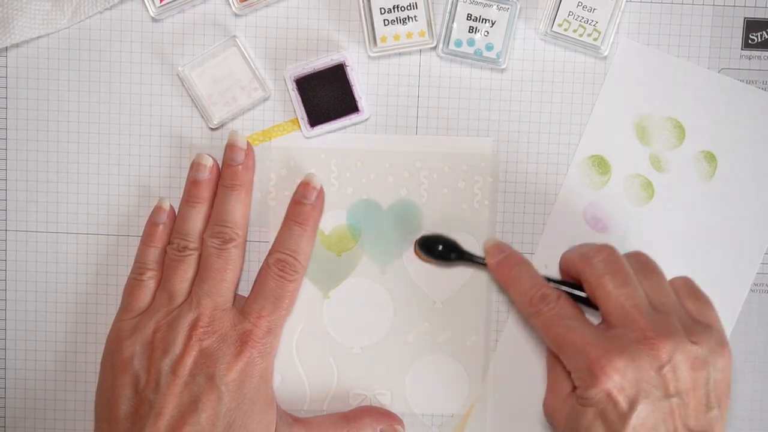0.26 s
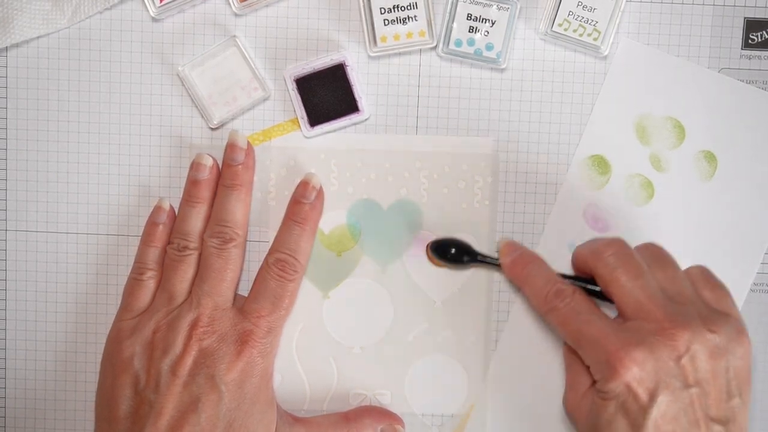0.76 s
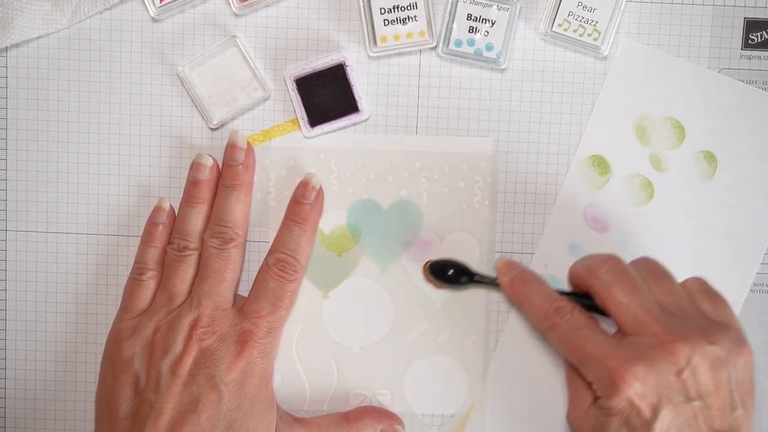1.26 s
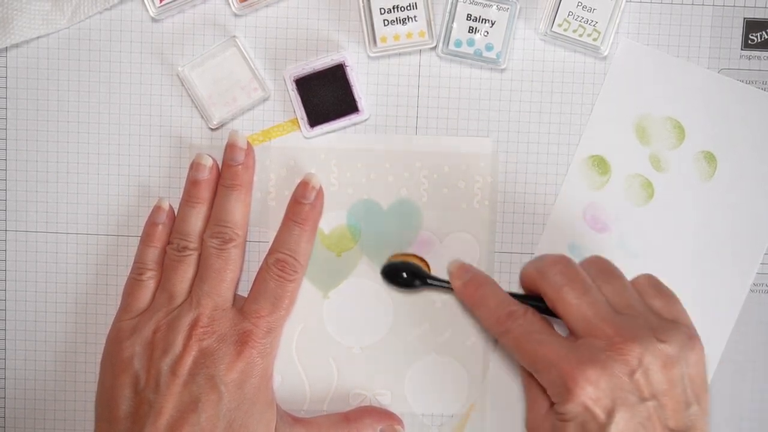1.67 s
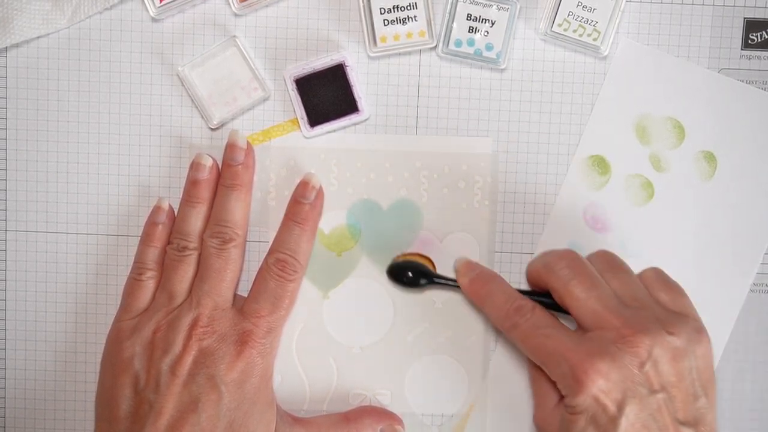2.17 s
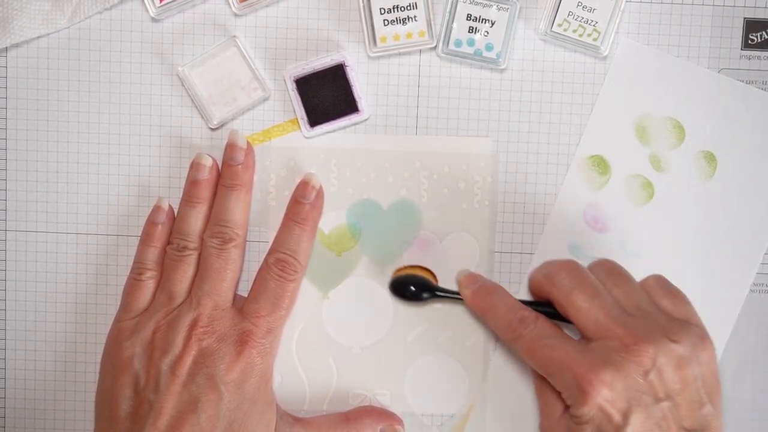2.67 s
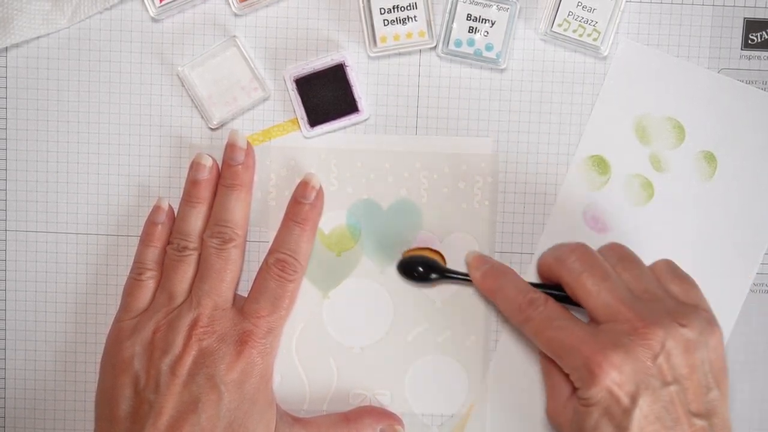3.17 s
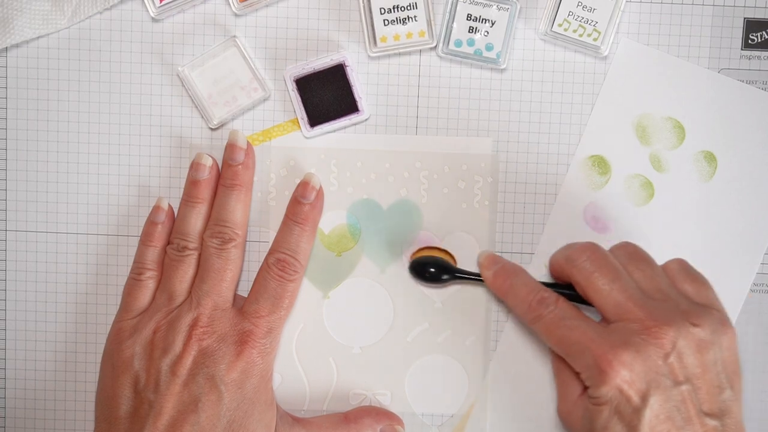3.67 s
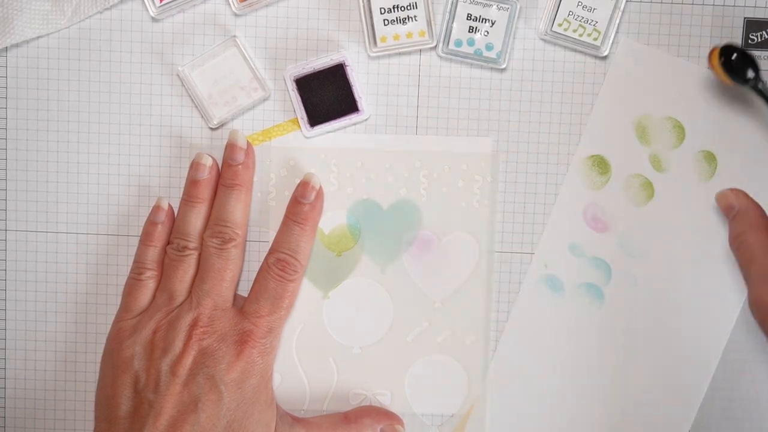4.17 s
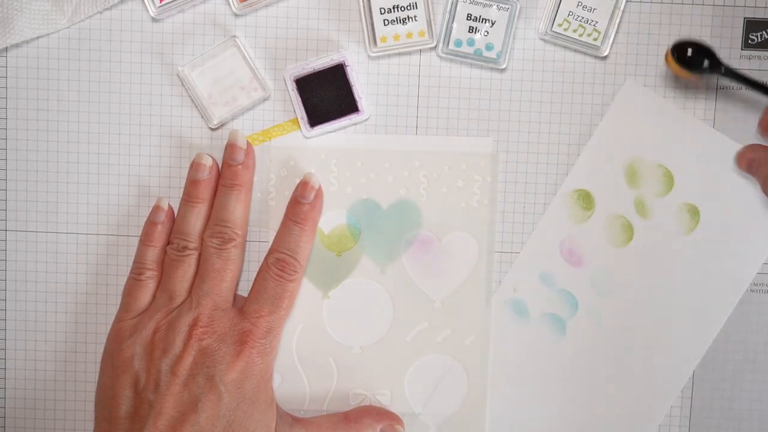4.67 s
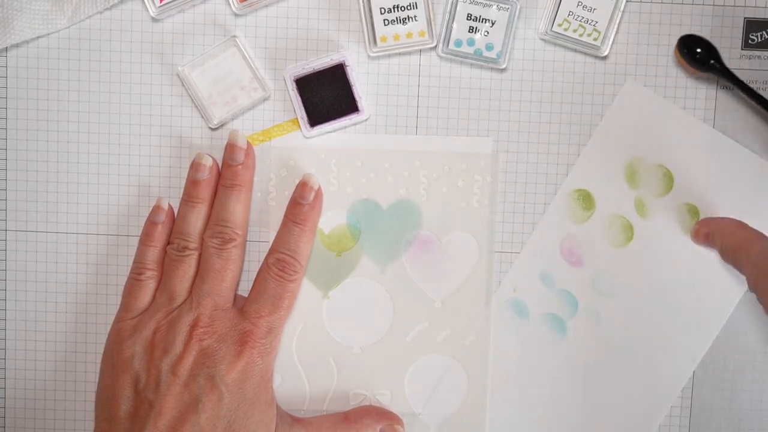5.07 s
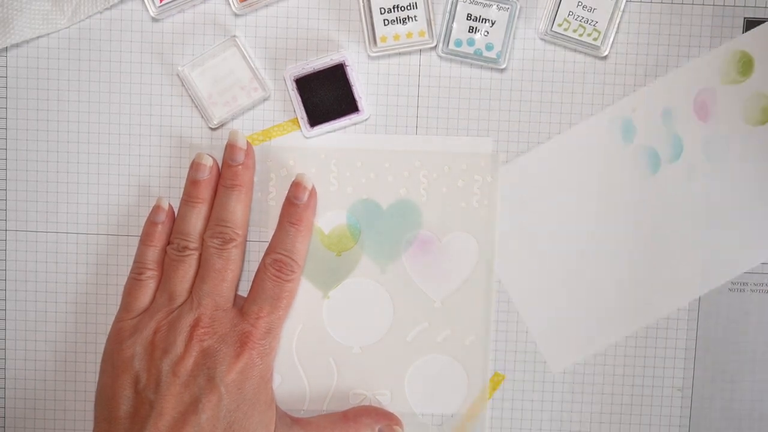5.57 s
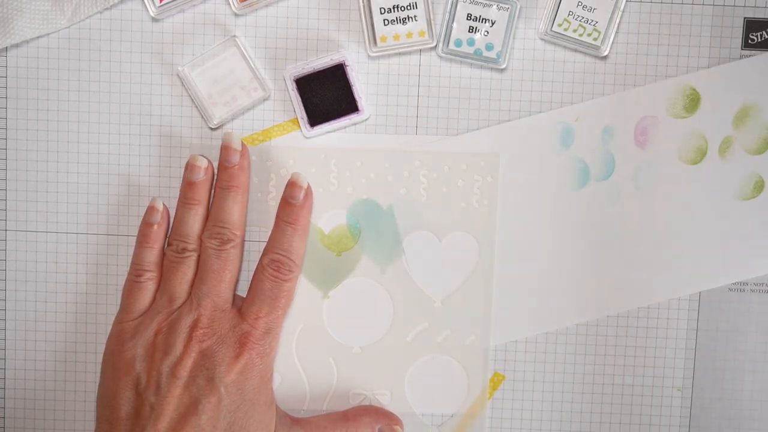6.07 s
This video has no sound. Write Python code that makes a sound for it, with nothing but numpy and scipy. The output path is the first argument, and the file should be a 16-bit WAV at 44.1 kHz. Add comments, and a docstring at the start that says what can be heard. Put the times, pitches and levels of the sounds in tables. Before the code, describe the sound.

A soft brush swishes in quick, growing circles over a plastic stencil, then paper snaps, scrapes and rustles as it is turned.

```python
"""Small room, craft table: a soft brush circles over a plastic stencil; fingers drag, snap and turn paper.
Bristles, sheet and skin are noise with spectral peaks; snaps and ticks are short bursts of crackle.
A motor hums under a faint hiss and a low rumble; the walls answer briefly."""
import sys
import numpy as np
from scipy import signal
from scipy.fft import rfft, irfft, next_fast_len
from scipy.io import wavfile
from scipy.ndimage import uniform_filter1d, map_coordinates

SR = 44100
rng = np.random.default_rng(int(sys.argv[2]) if len(sys.argv) > 2 else 0)


def materialize(psi):
    """Save the field psi as 16-bit PCM at rate SR to the path in sys.argv[1].

    A 1-D psi becomes a single channel; in a 2-D psi each row is a channel.
    """
    bounded = np.clip(np.atleast_2d(psi).T, -1, 1)
    quanta = np.round(bounded * 32767).astype(np.int16)
    wavfile.write(sys.argv[1], SR, quanta)


def gain_from_decibels(decibels):
    """Convert decibel values to linear amplitude factors."""
    exponent = np.asarray(decibels, float) / 20
    return 10 ** exponent


N = 278271  # samples

# motor lines: [f/Hz, mean level/dB]
MOTOR_LINES = [(59.5, -101), (120, -103), (240, -99.5), (360.3, -70.5), (480.4, -77.5)]
# spectra of low rumble and room hiss: [f/Hz, relative density/dB]
RUMBLE_SPECTRUM = [(150, -38), (300, -4), (420, 1.5), (530, -5.5), (800, -38.5)]
ROOM_SPECTRUM = [(25, -39), (45, -35), (60, -26), (90, -31.5), (190, -16), (280, -13.5), (380, -3.5),
                 (480, -11), (700, -16), (1900, -15), (3500, -17.5), (8000, -21), (16000, -26)]
# left-right likeness of room, brush, hands and paper: [f/Hz, correlation/1]
ROOM_LIKENESS = [(60, 0.69), (240, 1), (950, 0.62), (3770, 0.13), (15000, 0.15)]
BRUSH_LIKENESS = [(60, 0.65), (240, 0.6), (950, 1), (3770, 0.92), (15000, 0.55)]
NEAR_LIKENESS = [(60, 1.0), (240, 1), (950, 0.85), (3770, 0.94), (15000, 0.58)]
# brush circles, sweep and return:
# [start t/s, sweep share/1, sweep level/dB, return level/dB, treble over hiss/dB, easing at start/dB]
BRUSH_CIRCLES = [(0.0, 0.56, -72, -71.5, 5.5, 13), (0.23, 0.96, -67.5, -69, 1.5, 7.5),
                 (0.5, 0.43, -68.5, -68, -1, 6), (0.725, 0.44, -66, -63, 0.5, 4.5),
                 (1.03, 0.94, -62.5, -60.5, 2, 5.5), (1.295, 0.86, -61.5, -59, 1.5, 3),
                 (1.55, 0.68, -58, -59.5, 1.5, 7), (1.82, 0.85, -60, -63.5, 0.5, 6),
                 (2.045, 0.78, -59.5, -60, 2, 7.5), (2.3, 0.77, -62.5, -61.5, 1, 3.5),
                 (2.55, .72, -58.5, -60, 1, 9.5), (2.8, .7, -59, -61, 2, 8),
                 (3.05, 0.53, -56, -55.5, 1.5, 11), (3.345, 0.32, -58, -58, 1.5, 2),
                 (3.595, 0.53, -61.5, -58, 2, 7.5), (3.815, 0.35, -58.5, -55, 1.5, 1.5)]
# spectra of brush body and bristle tips: [f/Hz, relative density/dB]
BRISTLE_SPECTRUM = [(410, -62), (700, -17.5), (1860, -9), (2060, -7), (3840, -9.5), (8000, -7),
                    (10400, -13), (17600, -120)]
TIP_SPECTRUM = [(5000, -35), (7500, -9), (10000, -9.5), (13000, -8), (16000, -14)]
# peaks in the brush's colour, perhaps from close echoes: [f/Hz, width/Hz, level before common lift/dB]
BRUSH_PEAKS = [(1836, 15.7, 7), (2785, 48, -3), (3860, 98, 7), (4405, 56, 5), (4840, 45, 1),
               (5780, 193, 6.5), (6610, 165, 4.5), (7330, 56, -20), (8250, 91, -28), (8810, 116, 0.5),
               (9410, 140, 2.5), (10050, 260, -4.5), (11200, 370, -25), (11840, 110, 1.5), (12600, 160, -2),
               (15160, 240, -2)]
# decay of the room's answer: [f/Hz, t60/s]
WALL_DECAY = [(500, 1), (3000, 0.33), (8000, 0.16), (15000, 0.12)]
# ticks of stencil edge, paper fold or table: [t/s, level before envelope/dB, centre f/Hz, width/octaves]
EDGE_TICKS = [(1.567, -44.5, 3500, 2.1), (1.786, -46, 3000, 2.6), (1.83, -50.5, 3000, 2.4),
              (2.518, -53.5, 2000, 1.1), (2.807, -44.5, 2500, 1.7), (2.809, -53.5, 700, 1.06),
              (3.06, -51.5, 1500, 0.61), (3.061, -55, 604, 0.83), (3.357, -38.5, 5000, 1.3),
              (4.319, -49.5, 10020, 0.42), (4.456, -57, 9040, 0.54), (4.671, -26.5, 4520, .73),
              (4.969, -53.5, 9100, 0.7), (5.068, -41, 6800, 0.44), (5.11, -39.5, 8000, .36),
              (5.243, -23, 3500, 0.32), (5.481, -22, 6000, .41), (5.503, -29, 4000, 0.39),
              (5.515, -40, 4000, 0.38), (5.733, -20, 6000, 0.78)]
# double snaps of brush on stencil (first row) and of paper:
# [t/s, level before envelope/dB, centre f/Hz, width/octaves, rebound re crack/dB]
DOUBLE_SNAPS = [(3.841, -36, 8200, 0.22, -8.5), (4.468, -23, 7200, .49, -2), (4.689, -5, 4900, .67, -14),
                (5.162, -9.5, 4430, 1.17, -11.5), (5.251, -2, 4630, 1.05, -16)]
# short dull rubs, perhaps the heel of the hand shifting: [start t/s, level/dB]
HAND_NUDGES = [(2.055, -61.5), (3.863, -60)]
# dull rub spectrum: [f/Hz, relative density/dB]
NUDGE_SPECTRUM = [(300, -22), (500, -4.5), (1000, -5), (2000, -9.5), (2400, -10), (4000, -46)]
# dull rub resonances: [f/Hz, width/Hz, level before common lift/dB]
NUDGE_MODES = [(1040, 110, -11), (1325, 41, 6), (1810, 86, 4)]
# fingertip glides over the sheet: [start t/s, length/s, hiss level at end/dB]
FINGER_GLIDES = [(4.316, 0.078, -68.5), (4.399, 0.067, -55.5), (4.54, .085, -61.5), (5.003, .105, -58),
                 (5.224, 0.017, -39.5)]
# sheet jerks: [peak t/s, sheet level/dB, skin level/dB, flap level/dB, skin run-up/(dB/s)]
SHEET_JERKS = [(4.478, -50.5, -53.5, -50, 2496), (4.688, -34, -29, -38, 379),
               (5.257, -26, -40.5, -39, 2498.5)]
# settling after a jerk: [sheet/(dB/s), skin/(dB/s), flap/(dB/s)]
JERK_SETTLE_DB_PER_S = 329, 502, 449
# long turn of the sheet: [t/s, sheet level/dB, fingertip level/dB, flap level/dB]
SHEET_TURN = [(5.112, -72, -69, -69.5), (5.126, -47.5, -49, -60), (5.136, -36.5, -41, -58),
              (5.155, -47.5, -44.5, -60), (5.178, -40, -39, -50), (5.2, -42, -41.5, -54),
              (5.226, -48.5, -48.5, -57), (5.32, -38.5, -39, -48.5), (5.39, -38, -46, -55),
              (5.44, -39.5, -41, -59.5), (5.515, -32.5, -43, -54), (5.536, -38, -43.5, -59),
              (5.65, -45.5, -50, -62), (5.686, -40, -42, -51.5), (5.74, -39.5, -41.5, -49.5),
              (5.84, -43.5, -47.5, -61), (5.87, -36.5, -47, -44), (5.906, -48, -53, -53),
              (5.954, -43, -48.5, -47), (6.008, -38.5, -45, -52.5), (6.022, -65.5, -63.5, -58),
              (6.06, -72, -70, -70)]
# spectra of sheet on table, skin on sheet, bowed sheet: [f/Hz, relative density/dB]
RUB_SPECTRUM = [(1800, -36.5), (2450, -18.5), (2800, -6.5), (4000, -1), (6500, -4), (8000, -14.5),
                (16000, -35.5)]
SKIN_SPECTRUM = [(4500, -42), (6800, -6.5), (8500, -5), (11000, -11), (14000, -8), (16000, -12)]
FLAP_SPECTRUM = [(500, -38.5), (1000, -16.5), (2000, -2), (2600, -6), (4000, -46.5)]
# resonances of sheet, fingertip, flap: [f/Hz, width/Hz, level before common lift/dB]
SHEET_MODES = [(2180, 170, -35), (2918, 47, 6.5), (3390, 320, 0.5), (4150, 59, 3), (5350, 140, 1.5),
               (5980, 57, 3), (5900, 44, -10), (6480, 43, 7.5)]
FINGER_MODES = [(7070, 300, 4.5), (9620, 640, 3), (12300, 2500, -1.5)]
FLAP_MODES = [(1260, 110, 3), (1690, 59, -15.5), (1970, 23, 2.5), (2272, 96, 4.5)]
# colour difference of the microphone ports: [f/Hz, left over right/dB]
PORT_LEAN = [(60, -1.5), (150, -0.5), (380, 2), (950, -0.5), (2380, -2), (5980, -3), (15000, 0.5)]


def unit(x):
    """Scaled to rms 1."""
    return x / np.sqrt(np.mean(x ** 2) + 1e-20)


def along(points, hz):
    """(Hz, value) points read on a log frequency axis."""
    f, v = np.transpose(points)
    return np.interp(np.log(hz + 1), np.log(f + 1), v)


def curves(rows):
    """A gate open while the rows last (4 ms edges), then one value per sample for each later column."""
    s, *cols = np.transpose(rows)
    t = np.arange(N) / SR
    gate = np.clip(np.minimum(t - s[0], s[-1] - t) / 0.004 + 1, 0, 1)
    return [gate] + [np.interp(t, s, c) for c in cols]


def wobble(rate_hz):
    """Smooth random curve with rate_hz knots a second."""
    knots = rng.standard_normal(int(N * rate_hz / SR) + 4)
    return map_coordinates(knots, [np.arange(N) * rate_hz / SR])


def filtered(x, response):
    """x times a response of frequency."""
    m = next_fast_len(x.shape[-1] + 8192)
    return irfft(rfft(x, m) * response(np.fft.rfftfreq(m, 1 / SR)), m)[..., :x.shape[-1]]


def humps(peaks, lift_db, hz):
    """Gain near 1 between the peaks, raised at each of them."""
    power = sum(gain_from_decibels(2 * (db + lift_db)) / (1 + (2 * (hz - c) / w) ** 2) for c, w, db in peaks)
    return np.sqrt(1 + power)


def friction(spectrum, peaks, lift_db, alike, grain_db, drift):
    """Stereo rms-1 noise of micro-slips in faint patches; peaks drift as the contact moves."""
    slips = rng.standard_normal((2, N)) * gain_from_decibels(grain_db * wobble(600))
    hz, t, z = signal.stft(slips, SR, nperseg=1024)
    field = uniform_filter1d(rng.standard_normal(z.shape[1:]), size=8, axis=0)
    patches_db = unit(uniform_filter1d(field, size=5, axis=1))
    shift = 1 + drift * np.interp(t, np.arange(N) / SR, wobble(5))
    # each peak swells and fades on its own, 2.08 dB rms
    swell = uniform_filter1d(rng.standard_normal((len(peaks), len(t))), size=6, axis=1)
    fading_db = 2.08 * np.sqrt(6) * swell
    alive = [(c, w, db + fade_db) for (c, w, db), fade_db in zip(peaks, fading_db)]
    gain = gain_from_decibels(patches_db) * humps(alive, lift_db, np.outer(hz, shift))
    pair = signal.istft(z * gain, SR, nperseg=1024)[1][:, :N]

    def mid_side(hz):
        angle = np.arccos(np.clip(along(alike, hz), -1, 1)) / 2
        return gain_from_decibels(along(spectrum, hz)) * [np.cos(angle), np.sin(angle)]

    mid, side = filtered(pair, mid_side)
    return unit(np.array([mid + side, mid - side]))


def background():
    """Motor lines waver in level and phase over room hiss; a low rumble comes and goes."""
    t = np.arange(N) / SR
    lines = np.zeros(N)
    for hz, db in MOTOR_LINES:
        level = np.sqrt(2) * gain_from_decibels(db + 2.4 * wobble(3.077))
        lines += level * np.sin(2 * np.pi * hz * t + 0.4 * wobble(9))
    rumble_level = gain_from_decibels(-83.0 + 3.5 * wobble(3.2))
    noise = rng.standard_normal(N)
    rumble = rumble_level * unit(filtered(noise, lambda hz: gain_from_decibels(along(RUMBLE_SPECTRUM, hz))))
    hiss = gain_from_decibels(-68.5) * friction(ROOM_SPECTRUM, [], 0, ROOM_LIKENESS, grain_db=0, drift=0)
    return lines + rumble + hiss


def circling():
    """Gate, hiss and treble levels in dB: the brush eases at each circle's start and turn, then lifts."""
    lift_s, lift_fade_s, lift_fade_db = 4.035, 0.04, 20.5
    sweep_top, return_top = 0.71, 0.5  # loudest point as a share of each half
    turn_ease_db = 4
    points, ends = [], [row[0] for row in BRUSH_CIRCLES[1:]] + [lift_s]
    for (s, turn, sweep_db, return_db, treble_db, ease_db), end in zip(BRUSH_CIRCLES, ends):
        shares = 0, sweep_top * turn, turn, turn + return_top * (1 - turn)
        levels = sweep_db - ease_db, sweep_db, min(sweep_db, return_db) - turn_ease_db, return_db
        points += [(s + share * (end - s), db, treble_db) for share, db in zip(shares, levels)]
    points.append((lift_s, return_db - turn_ease_db, treble_db))
    points.append((lift_s + lift_fade_s, return_db - lift_fade_db, -6))
    return curves(points)


def brush():
    """Thousands of soft bristles slip at once: a smooth hiss that swells with each circle."""
    gate, hiss_db, treble_db = circling()
    body = friction(BRISTLE_SPECTRUM, BRUSH_PEAKS, 8.6, BRUSH_LIKENESS, grain_db=0, drift=0.0099)
    tip_level = gain_from_decibels(hiss_db + treble_db + 0.82 * wobble(14))
    tips = friction(TIP_SPECTRUM, BRUSH_PEAKS, 7.7, BRUSH_LIKENESS, grain_db=1.0, drift=0.006)
    return gate * (gain_from_decibels(hiss_db) * body + tip_level * tips) * gain_from_decibels(0.6 * wobble(26))


def walls(x):
    """Room answer: a noise tail in which each frequency dies at its own speed, 300 samples late."""
    hz, t, z = signal.stft(rng.standard_normal((2, SR // 2)), SR, nperseg=256)
    decay = gain_from_decibels(-60 * t / along(WALL_DECAY, hz)[:, None])
    tail = signal.istft(z * decay, SR, nperseg=256)[1]
    late = np.pad(x, ((0, 0), (300, 0)))
    return signal.fftconvolve(late, tail / np.linalg.norm(tail[0]), axes=1)[:, :N]


def thin(x):
    """A thin sheet radiates no bass: fourth-order slope around 280 Hz."""
    return filtered(x, lambda hz: (1j * hz / (280 + 1j * hz)) ** 4)


def snaps():
    """Ticks, cracks and duller rebounds: crackle coloured around a centre; higher ones are shorter."""
    rebound_s, rebound_pitch = 0.006, 0.9
    rise_cycles, ring_cycles = 3.86, 83  # build-up constant; fall by 60 dB
    out, t = np.zeros((2, N + SR)), np.arange(SR // 8) / SR
    cracks = [row[:-1] for row in DOUBLE_SNAPS]
    rebounds = [(s + rebound_s, db + loss_db, hz * rebound_pitch, octaves)
                for s, db, hz, octaves, loss_db in DOUBLE_SNAPS]
    for s, db, centre_hz, octaves in EDGE_TICKS + cracks + rebounds:
        a, b = rng.standard_normal((2, len(t)))

        def colour(hz):
            bell = np.exp(-0.5 * (np.log2((hz + 1) / centre_hz) / octaves) ** 2)
            return bell * humps(SHEET_MODES, 9.4, hz)

        crackle = unit(filtered(np.array([a + 0.13 * b, a - 0.3 * b]), colour))
        cycles = t * centre_hz
        envelope = gain_from_decibels(db - 60 * cycles / ring_cycles) * (1 - np.exp(-cycles / rise_cycles)) ** 2
        out[:, round(s * SR):][:, :len(t)] += envelope * crackle
    return filtered(thin(out[:, :N]), lambda hz: hz < 16900)


def nudges():
    """Soft skin dragging briefly, no treble: each rub swells, holds, drops and trails off."""
    attack_s, hold_s, drop_s, tail_s, drop_db = 0.018, 0.077, 0.041, 0.15, 8.5
    rub = friction(NUDGE_SPECTRUM, NUDGE_MODES, 8.7, NEAR_LIKENESS, grain_db=0, drift=0.0082)
    steps_s = np.cumsum([0, attack_s, hold_s, drop_s, tail_s])
    shape_db = np.array([-20, 0, 0, -drop_db, -drop_db - 7])
    level = np.zeros(N)
    for s, top_db in HAND_NUDGES:
        gate, db = curves(np.transpose([s + steps_s, top_db + shape_db]))
        level += gate * gain_from_decibels(db)
    return rub * level


def handling():
    """Gains of sheet, skin and flap: long turn, jerks that speed up and settle, light glides on skin."""
    run_up_ratios = 0.89, 1, 2.5  # sheet, skin, flap
    glide_attack_s, glide_release_s, glide_growth_db = 0.012, 0.015, 5
    t = np.arange(N) / SR
    gate, *turn_db = curves(SHEET_TURN)
    gains = gate * gain_from_decibels(np.array(turn_db))
    for s, *peak_db, run_up in SHEET_JERKS:
        for gain, db, ratio, settle in zip(gains, peak_db, run_up_ratios, JERK_SETTLE_DB_PER_S):
            gain += gain_from_decibels(db + np.minimum(ratio * run_up * (t - s), settle * (s - t)))
    for s, length, db in FINGER_GLIDES:
        growth_db = glide_growth_db * np.clip((t - s) / length - 1, -1, 0)
        edges = np.minimum((t - s) / glide_attack_s, (s + length - t) / glide_release_s)
        gains[1] += gain_from_decibels(db + growth_db) * np.clip(edges, 0, 1)
    return gains


def paper():
    """The sheet scrapes on the table, skin hisses on the sheet, the bowed sheet adds a lower flap."""
    sheet, skin, flap = handling()
    sheet = sheet * friction(RUB_SPECTRUM, SHEET_MODES, 6.6, NEAR_LIKENESS, grain_db=0.5, drift=0.022)
    skin = skin * gain_from_decibels(0.98 * wobble(30))
    skin = skin * friction(SKIN_SPECTRUM, FINGER_MODES, 10, NEAR_LIKENESS, grain_db=0, drift=0.02)
    flap = flap * gain_from_decibels(0.73 * wobble(40))
    flap = flap * friction(FLAP_SPECTRUM, FLAP_MODES, 2.1, NEAR_LIKENESS, grain_db=0.45, drift=0.032)
    return thin((sheet + skin + flap) * gain_from_decibels(1.7 * wobble(110)))


def scene():
    """Table sounds, room answer and background; only snaps and ticks pass above top_hz."""
    top_hz = 15750
    cracks = snaps()
    table = brush() + nudges() + paper()
    steady = table + gain_from_decibels(-16.5) * walls(table + cracks) + background()
    return filtered(steady, lambda hz: hz < top_hz) + cracks


def band_limit(x):
    """A steep low-pass at the top of the band."""
    return signal.sosfilt(signal.butter(12, 16970, fs=SR, output="sos"), x)


def record(dry):
    """Two microphone ports that differ a little in colour."""
    sides = np.array([[1], [-1]])
    ports = filtered(dry, lambda hz: gain_from_decibels(along(PORT_LEAN, hz) / 2 * sides))
    return band_limit(ports)


dry = scene()
out = record(dry)
materialize(out)
```